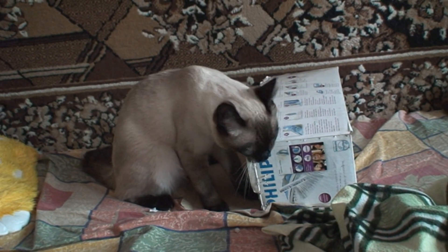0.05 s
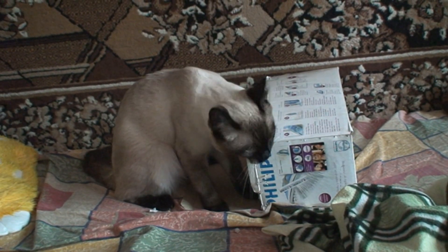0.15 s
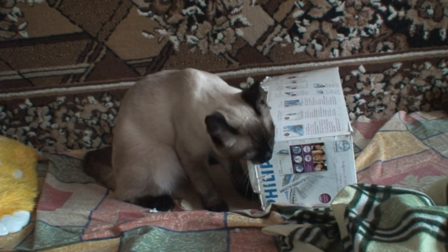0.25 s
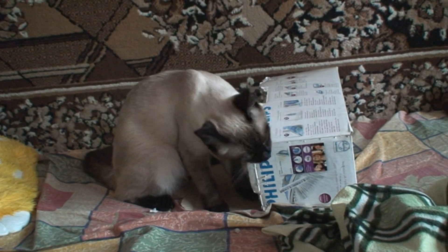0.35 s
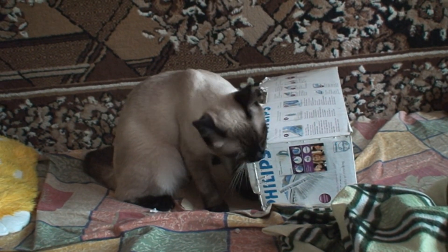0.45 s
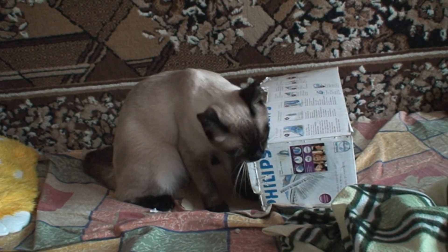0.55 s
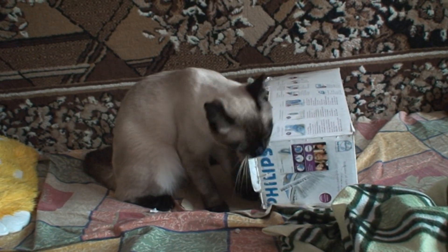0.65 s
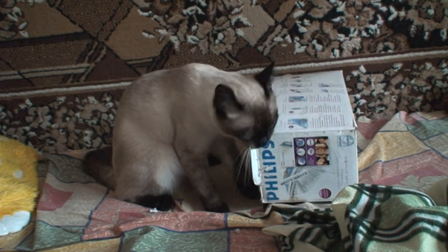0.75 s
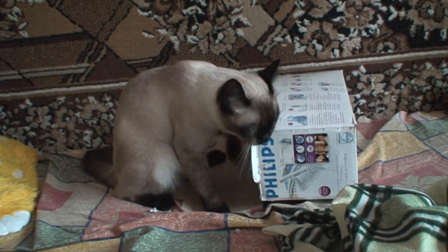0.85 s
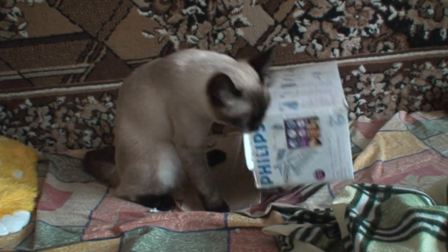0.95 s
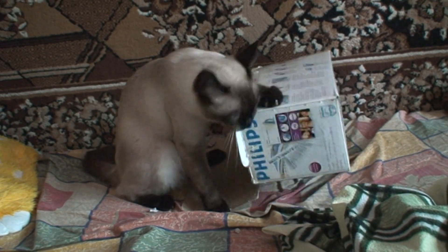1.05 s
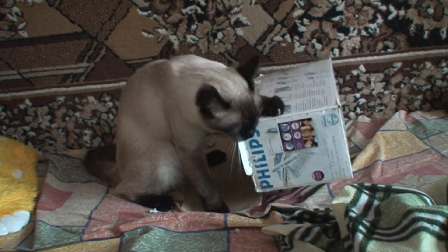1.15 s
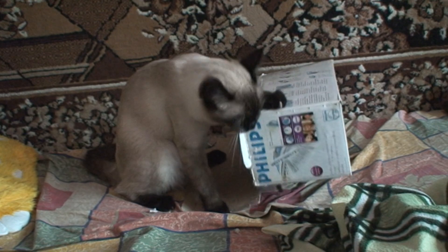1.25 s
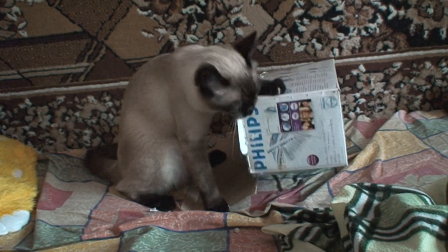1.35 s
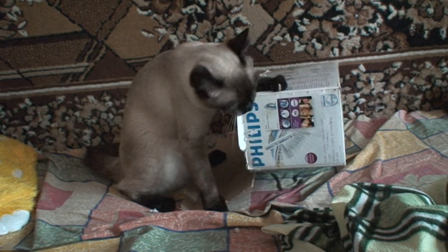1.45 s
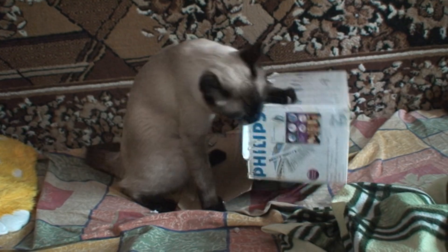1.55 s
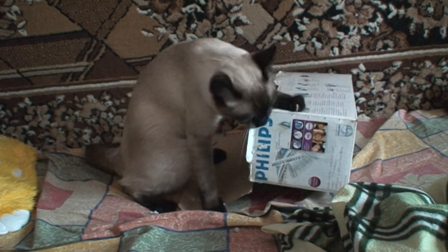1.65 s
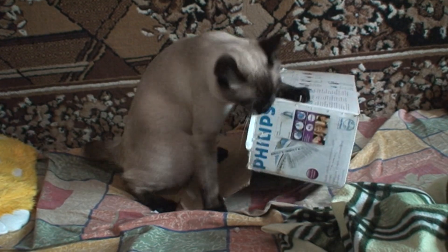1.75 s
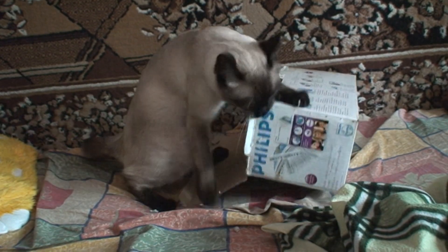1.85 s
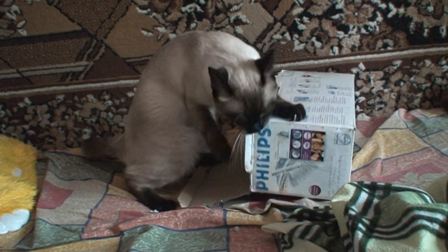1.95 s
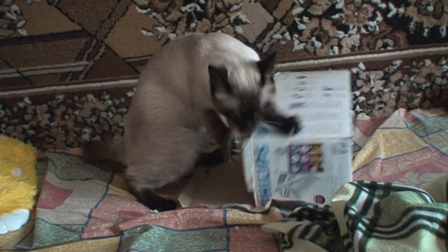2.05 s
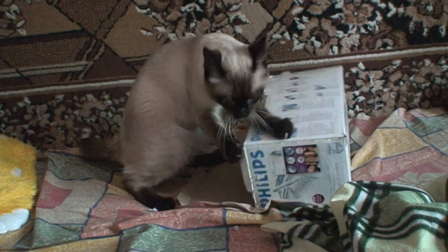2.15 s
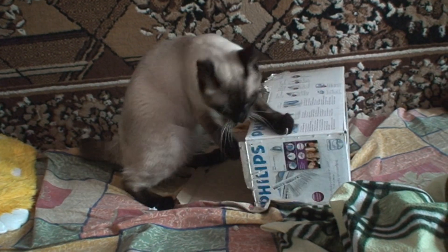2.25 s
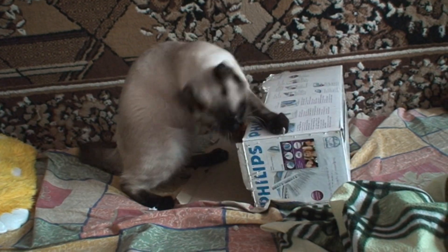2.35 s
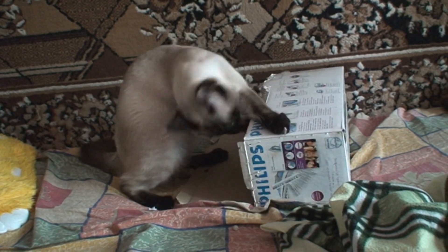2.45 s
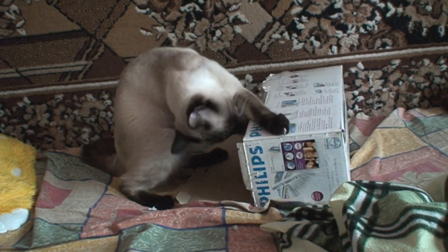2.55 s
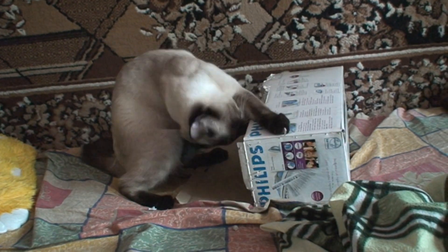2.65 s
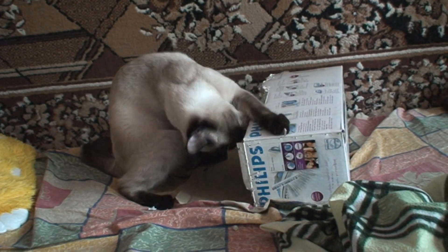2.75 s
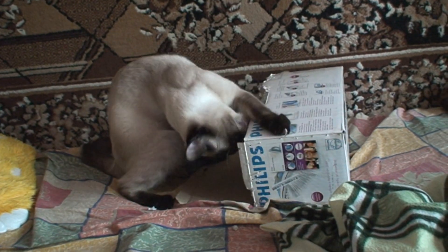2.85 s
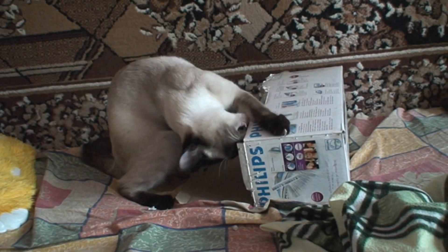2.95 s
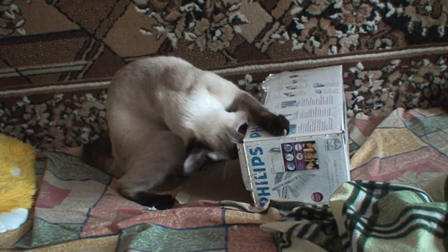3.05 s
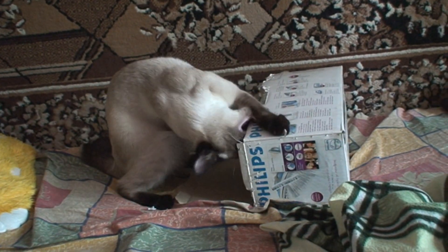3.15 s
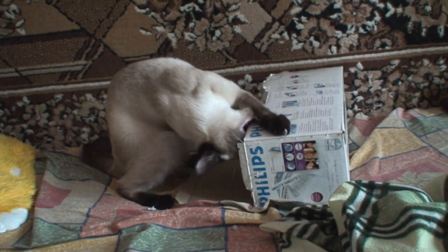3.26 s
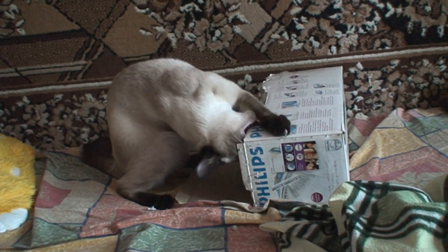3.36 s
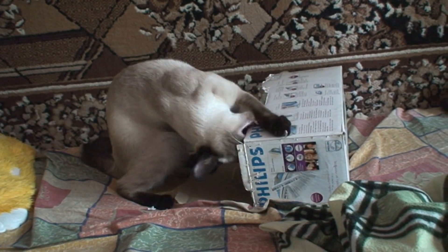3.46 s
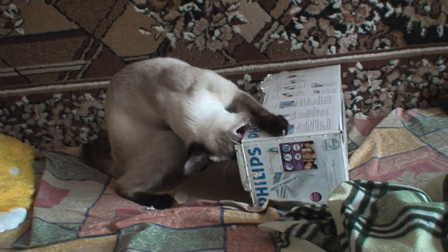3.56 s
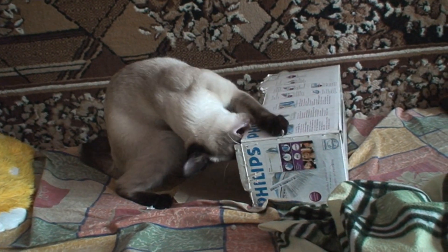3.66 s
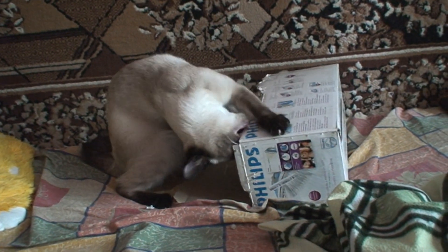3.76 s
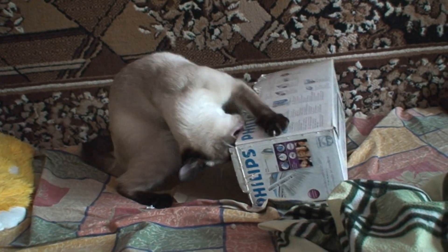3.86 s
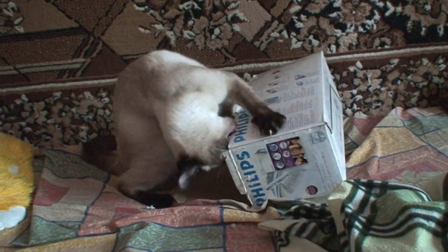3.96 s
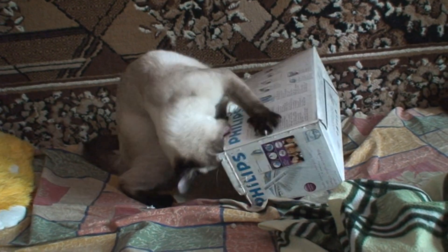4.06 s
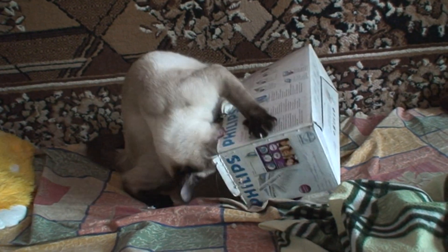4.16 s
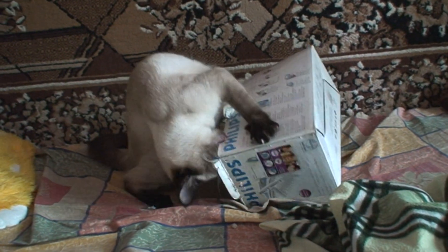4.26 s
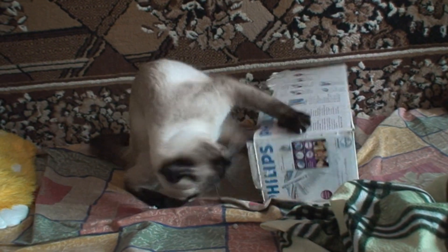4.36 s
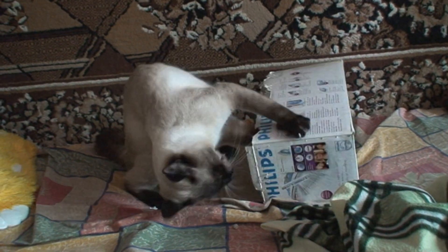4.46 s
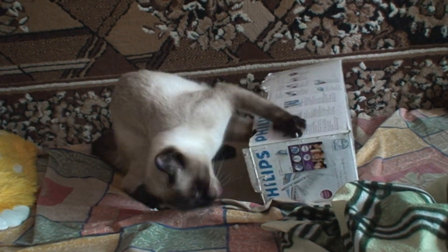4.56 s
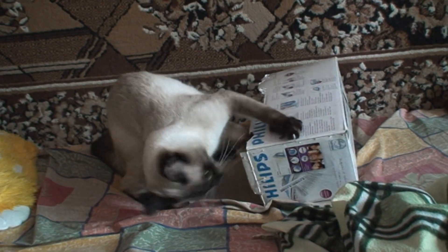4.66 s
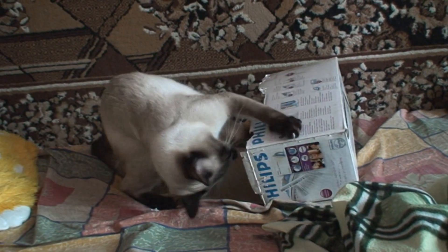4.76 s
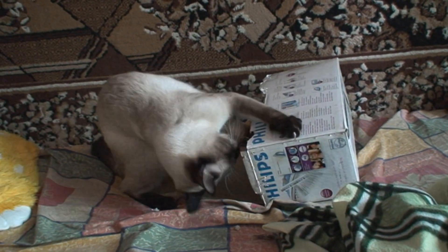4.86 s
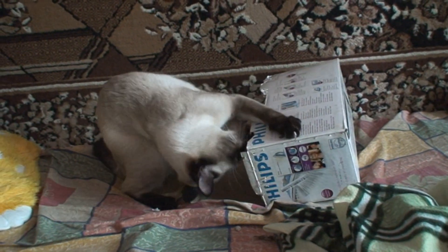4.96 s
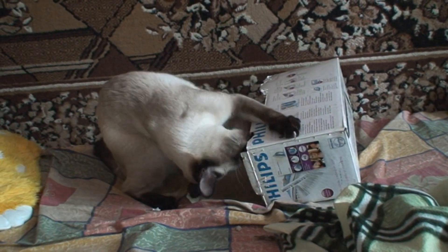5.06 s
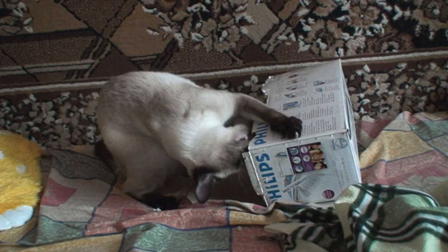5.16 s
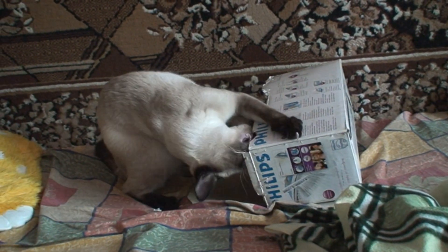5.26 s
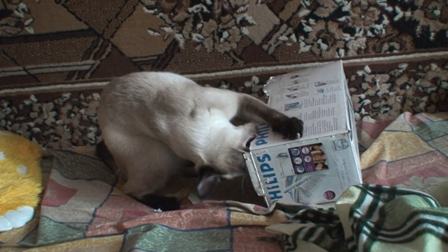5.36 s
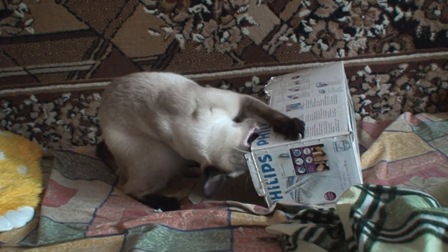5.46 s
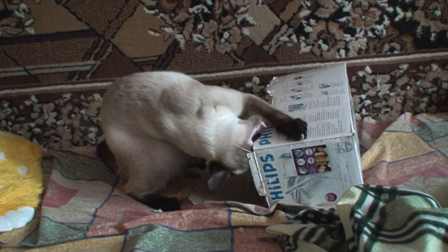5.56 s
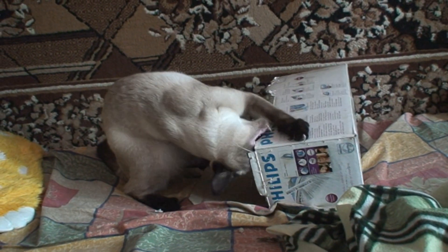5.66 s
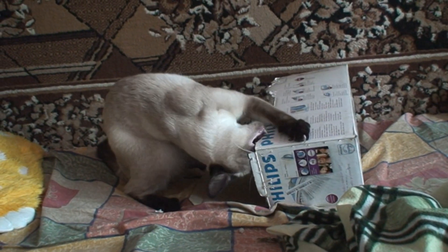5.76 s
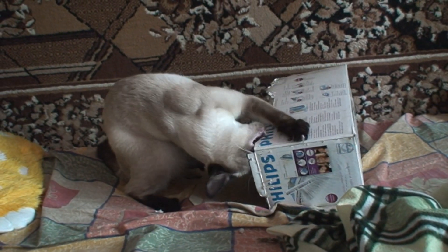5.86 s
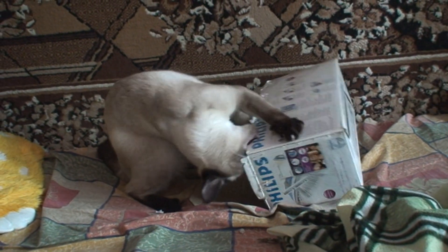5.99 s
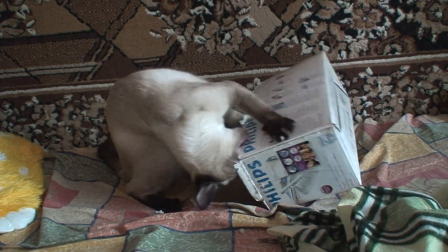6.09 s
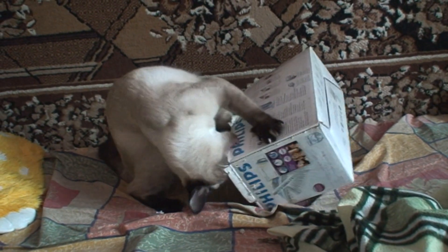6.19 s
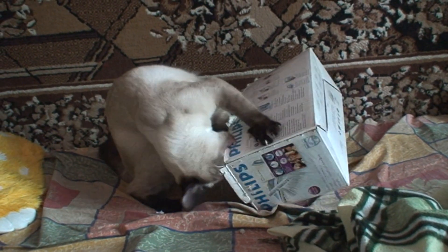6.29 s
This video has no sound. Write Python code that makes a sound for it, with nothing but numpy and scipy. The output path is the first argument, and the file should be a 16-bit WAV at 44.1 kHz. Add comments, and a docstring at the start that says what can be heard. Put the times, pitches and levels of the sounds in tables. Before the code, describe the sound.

In a small furnished room with a soft low rush, a cat worries a cardboard box. Muffled bumps come first, then a drop and sharp hollow snap near one second, a harder knock just after two, sparse scratches, and a dense flurry of cracks, tooth grinding and a loud hollow thud past four. Faint scraping and ticking follow, ending in crisp crackles. Close stereo microphone, short dry echoes.

```python
"""A cat bites and claws a small cardboard box on a carpet in a quiet room; box modes and short echoes colour it.
From the start there is shaped noise with narrow hums; padded blows (decaying sines) and snaps (a click, then
noise bursts) soon join it. Near 0.9 and 2.1 s the box drops with a thump and a puff, and strokes of random slips
scrape and tear. From 4 to 4.4 s blows crowd, teeth grind by stick-slip and the box drops again; scrapes and snaps
go on to 6.3 s. The noise sinks at 1.03, 2.1 and 4.42 s, each time creeping part of the way back."""
import sys
import numpy as np
from scipy import signal
from scipy.fft import rfft, irfft, next_fast_len
from scipy.io import wavfile

SR = 44100
rng = np.random.default_rng(int(sys.argv[2]) if len(sys.argv) > 2 else 0)


def materialize(psi):
    """Save the field psi as 16-bit PCM at rate SR to the path in sys.argv[1].

    A 1-D psi becomes a single channel; in a 2-D psi each row is a channel.
    """
    bounded = np.clip(np.atleast_2d(psi).T, -1, 1)
    quanta = np.round(bounded * 32767).astype(np.int16)
    wavfile.write(sys.argv[1], SR, quanta)


N = 278961  # samples

# spectrum of the rushing room noise, relative: frequency_hz, density_db_per_hz
RUSH_SPECTRUM = [(15, -34), (25, -20), (49, 6.5), (80, -2), (206, -1), (363, -3.5), (394, -7.5), (439, -4),
                 (734, -6.5), (818, -3), (1020, -5.5), (2610, -14), (9570, -29), (13600, -32), (16000, -44)]
# narrow hums in the room noise, level relative to the rush: centre_hz, width_hz, level_db
HUM_BANDS = [(61.1, 4, -24), (112, 8.7, -27), (790.5, 42, -13.5)]
# sudden dips of the room noise, before its trim: start_s, lowest_db
NOISE_DIPS = [(1.03, -48), (2.1, -54.5), (4.42, -53)]
# left-right coherence of diffuse sound: frequency_hz, likeness (0 to 1)
COHERENCE = [(60, 0.99), (130, 0.96), (290, 0.85), (640, 0.55), (1410, 0.54), (3100, 0.67), (6820, 0.53),
             (15000, 0.99)]
# early wall echoes, before a small random shift: delay_s, gain (ratio)
WALL_ECHOES = [(.0025, 0.14), (.0083, 0.32), (0.0127, .15), (0.0228, .15)]
# reverberation time of the room: frequency_hz, t60_s
REVERBERATION = [(100, 0.23), (300, 0.23), (1000, 0.16), (4000, 0.16), (13000, 0.17)]
# modes of panels, flaps and air cavity, relative to the direct force: centre_hz, width_hz, gain_db
BOX_MODES = [(122.6, 14, 3.5), (199.2, 23, 10), (291, 18.8, 15), (532, 97, 9.5), (872, 49, 7),
             (1228, 52, -9), (1697, 30, -8), (2640, 120, -3.5), (3210, 270, -11), (7200, 1500, -1.5),
             (11840, 960, -1)]
# edges of the thud, hollow, rasp, crack and fizz bands: edge_hz
BAND_EDGES = [120, 400, 1000, 2800, 8000, 16000]
# the box dropping back on the carpet: start_s, level_db, panel_hz, left_minus_right_db
BOX_DROPS = [(0.926, -18, 124.5, -0.5), (2.081, -17, 121, -9), (4.36, -26.5, 132, -16)]
# soft bumps of paw and box, before their trim: start_s, level_db, panel_hz
PAW_BUMPS = [(.007, -28, 294), (.064, -25, 167), (.385, -25, 141), (.507, -20.5, 528), (.534, -25.5, 239),
             (0.723, -39, 291), (.955, -22.5, 126), (1.49, -28, 638), (1.51, -21, 80), (1.633, -31, 480),
             (2.078, -15.5, 526), (2.085, -15, 530), (2.268, -23.5, 307), (2.676, -26.5, 532),
             (3.410, -24, 207), (3.884, -24.5, 520), (4.345, -19.5, 191), (4.363, -8.5, 521),
             (4.463, -28, 566), (4.576, -30, 578), (5.361, -24, 560)]
# a tooth grinding in the board, rms before the room: centre_s, half_length_s, rms_db, pitch_hz
TOOTH_GRINDS = [(3.959, 0.021, -41, 1570), (4.205, 0.013, -28.5, 1100), (4.244, .005, -31, 795),
                (4.257, 0.013, -34, 980), (6.027, 0.023, -41, 1180)]
# scraping and tearing strokes, before their trim:
# centre_s, half_length_s, level_db, brightness_db_per_octave, hollowness_db
SCRAPE_STROKES = [(0.496, 0.051, -51.5, -6, 4), (0.855, 0.06, -52.5, -1, 7), (1.46, 0.077, -56.5, -1.7, 1),
                  (1.63, 0.088, -61, -3, -4), (1.82, 0.17, -57.5, -0.5, 4),
                  (2.081, 0.0087, -30.5, -3.5, 6.5), (2.119, 0.028, -49, -4.3, 13),
                  (2.262, 0.023, -59.5, -1.5, 2), (2.507, 0.068, -50, -0.5, 14.5),
                  (2.707, .035, -56, -2.5, 17), (3.011, 0.061, -50, -0.2, 20),
                  (3.548, 0.094, -57, -4.5, 10), (3.857, 0.13, -50, -1.5, 11.5),
                  (3.972, 0.066, -46, -2.1, 4), (4.039, 0.075, -50, 0.5, 4.5),
                  (4.121, 0.076, -50.5, -1.1, 1), (4.189, 0.037, -50, 0.5, -1.5),
                  (4.255, 0.035, -43, -2, 4), (4.336, .016, -42, -2.5, 1), (4.36, .028, -29.5, -1, 3.5),
                  (4.396, 0.043, -35.5, 0.5, 7.5), (4.438, 0.039, -46, -.5, 14),
                  (4.596, 0.058, -56, -3, 14), (4.969, 0.35, -62, -4, 9), (5.447, 0.033, -53.5, -3.5, 13),
                  (5.622, 0.068, -57, -3, 2), (5.759, 0.069, -54.5, -4, 3.5), (5.924, 0.038, -52, -1.3, 2),
                  (6.031, .025, -46.5, -4, 3.5), (6.084, .07, -47.5, -2, 6), (6.145, 0.095, -48, -1, 4.5),
                  (6.223, 0.094, -53.5, 0, 0.5), (6.285, 0.043, -41.5, 0.5, 0)]
# colour shared by all strokes, one value per band: gain_db
STROKE_COLOUR = [1.1, 0.83, -0.92, -1.5, -0.51]
# teeth and claws snapping the board, before their trim:
# start_s, level_db, brightness_db_per_octave, hollowness_db, spot_pitch_hz
BOARD_SNAPS = [(0.0706, -46.5, 2, 14.5, 2500), (0.7235, -44.5, -2, 1, 1220), (0.9241, -40.5, -3, 0, 1220),
               (1.066, -20, -2.5, 19.5, 1290), (1.087, -44, -1, 7, 1290), (1.4881, -46, -4.5, 0.5, 1250),
               (1.729, -46.5, 1, 18, 1700), (1.852, -42.5, 0.6, 22.5, 2070), (2.0851, -28, -5, 19.5, 1210),
               (2.095, -40, -4.5, 6, 1190), (2.4746, -38.5, -0.5, 18, 1630), (2.6776, -41, -0.5, 18, 1730),
               (3.7, -47.5, -3, 3.5, 960), (3.7208, -39.5, -1.8, 3.5, 1190),
               (3.8841, -39.5, -3.5, 12, 1550), (3.9074, -46, -1.5, 14, 2680), (3.9425, -54, 0, 4, 1340),
               (3.9679, -41, 0.5, 0, 2000), (4.0635, -25, -3.5, 13.5, 1170), (4.1813, -46, 0.9, 2, 1490),
               (4.3278, -48, -4, 5, 1380), (4.344, -37, -2.7, -5.5, 1250), (4.3768, -30, 1.5, 10, 1020),
               (4.3874, -30.5, 1.5, 13, 900), (4.5765, -49, -2.5, 12, 1230), (4.6318, -53.5, 1.5, 12, 2430),
               (4.7573, -58, 2.5, 2.5, 1030), (4.9605, -77.5, 5, -4, 1270), (5.3612, -42.5, -1.5, 13, 880),
               (5.4126, -52, -4.5, 3, 970), (5.4216, -52.5, -1.8, 3, 950), (5.4904, -58, 3.5, 11.5, 1480),
               (5.7304, -46.5, -2, 6.5, 1380), (5.9026, -52, -1, 3, 1040), (5.9971, -53.5, -2, -0.5, 1120),
               (6.0599, -40.5, 4.5, 30, 1010), (6.086, -41, 1.5, 15.5, 1380), (6.2863, -34, 1.6, 7, 1040),
               (6.2961, -52, -3.5, 8, 1060)]
# stereo balance of the microphones: frequency_hz, left_minus_right_db
STEREO_LEAN = [(60, -2), (110, -0.5), (200, -2), (380, -2), (700, -2.5), (1290, -2), (2380, -1), (4400, 0),
               (8120, -1.5), (15000, -1)]

# the room noise before its trim: undisturbed level, and how it sinks, waits and creeps back
NOISE_DB, SINK_S, HOLD_S, RECOVER_DB_PER_S = -43, 0.012, 0.51, 3
# hollowness is centred on the first; the second is where its full loss in dB is reached
MIDDLE_HZ, HALF_RANGE_OCTAVES = 1647, 2.47
TOP_HZ = 15800  # band limit


def amp(db):
    """Level definition: decibels to an amplitude ratio."""
    return 10 ** (np.asarray(db) / 20)


def unit(x):
    """Normalisation by mean power: x scaled to an rms of one."""
    return x / np.sqrt(np.mean(x ** 2) + 1e-20)


def along(points, hz):
    """Logarithmic frequency scale: interpolate (Hz, value) points at hz."""
    f, v = np.transpose(points)
    return np.interp(np.log(hz + 1), np.log(f + 1), v)


def fade(t, t60):
    """Exponential decay: the amplitude falls by 60 dB in t60 seconds."""
    return np.exp(-np.log(1000) * t / np.maximum(t60, 1e-4))


def add(track, s, x):
    """Superposition: mix x into the track at time s."""
    start = max(round(s * SR), 0)
    part = track[..., start:start + x.shape[-1]]
    part += x[..., :part.shape[-1]]


def filtered(x, response):
    """Linear filtering: the spectrum of x times a response of frequency."""
    n = x.shape[-1]
    m = next_fast_len(n + SR // 8)
    f = np.fft.rfftfreq(m, 1 / SR)
    return irfft(rfft(x, m) * response(f), m)[..., :n]


def resonances(modes, f):
    """Modal superposition: the causal response of damped (Hz, width Hz, dB) modes."""
    return sum(amp(db) * 1j * f * w / (c * c - f * f + 1j * f * w) for c, w, db in modes)


def panned(pair, lean_db):
    """Level difference between ears: tilt a stereo pair to the left by lean_db."""
    return pair * amp([[lean_db / 2], [-lean_db / 2]])


def diffuse(pair):
    """Spatial coherence: two close microphones hear diffuse sound with a likeness that depends on frequency."""
    def turn(f):
        return np.arccos(np.clip(along(COHERENCE, f), 0, 1)) / 2

    mid, side = filtered(pair, lambda f: np.array([np.cos(turn(f)), np.sin(turn(f))]))
    return np.array([mid + side, mid - side])


def in_room(x, wet_db, build=0.0014):
    """Room impulse response: direct sound, early echoes and a diffuse tail, drawn anew for each event."""
    hz, t, z = signal.stft(rng.standard_normal((2, SR // 4)), SR, nperseg=256)
    envelope = fade(t, along(REVERBERATION, hz)[:, None]) * (1 - np.exp(-t / build))
    tail = diffuse(signal.istft(z * envelope, SR, nperseg=256)[1])
    response = amp(wet_db) * tail / np.linalg.norm(tail[0])
    response[:, 0] += 1  # direct sound
    for delay, gain in WALL_ECHOES:
        response[:, round(delay * rng.uniform(.95, 1.05) * SR)] += gain
    return signal.fftconvolve(x[None], response, axes=1)


def board(force, soft_hz=3000, crisp=0.069):
    """Forced vibration: the force is heard directly and through the box modes; soft board damps the treble."""
    def response(f):
        damping = crisp + 1 / (1 + 1j * f / soft_hz)
        return (1 + resonances(BOX_MODES, f)) * damping

    return filtered(force, response)


def band_centres():
    """Logarithmic band division: each centre is the geometric mean of its edges in Hz."""
    return np.sqrt(np.multiply(BAND_EDGES[:-1], BAND_EDGES[1:]))


def contact(db, brightness, hollowness):
    """Contact spectrum: a sharp tip tilts it to the treble, a free panel lowers both ends against the middle."""
    octaves = np.log2(band_centres() / MIDDLE_HZ)
    return db + brightness * octaves - hollowness * (octaves / HALF_RANGE_OCTAVES) ** 2


def voiced(x, levels_db, span, lowest_hz=130):
    """Minimum-phase filtering: steer the bands of x smoothly towards rms levels taken over span seconds."""
    m = 2 * next_fast_len(len(x))
    f = np.fft.rfftfreq(m, 1 / SR)
    # a small box radiates little bass
    spectrum = rfft(x, m) * (1j * f / (lowest_hz + 1j * f)) ** 2
    energy = np.histogram(f, BAND_EDGES, weights=np.abs(spectrum) ** 2)[0]
    power = energy * 2 / (m * span * SR)
    band_gain = np.log(amp(levels_db) / np.sqrt(power))
    log_gain = along(np.transpose([band_centres(), band_gain]), f)
    # folding the cepstrum onto positive times makes the filter causal
    cepstrum = irfft(log_gain)[:m // 2]
    cepstrum[1:] *= 2
    return irfft(spectrum * np.exp(rfft(cepstrum, m)))[:len(x)]


def noise_level():
    """Piecewise-linear level in dB: after each dip it waits, then creeps back at a steady rate."""
    t = np.arange(N) / SR
    level = np.full(N, float(NOISE_DB))
    for s, low_db in NOISE_DIPS:
        recovered = low_db + RECOVER_DB_PER_S * np.maximum(t - s - HOLD_S, 0)
        creeping = np.minimum(recovered, NOISE_DB)
        sunk = np.clip((t - s) / SINK_S, 0, 1)
        level = level + sunk * (creeping - level)
    return level


def room_noise(level_db=-0.5):
    """Diffuse field: a rush of shaped noise and narrow-band hums come from all around."""
    rush, hum = rng.standard_normal((2, 2, N))
    noise = unit(filtered(rush, lambda f: amp(along(RUSH_SPECTRUM, f))))
    for hz, width_hz, db in HUM_BANDS:
        band = filtered(hum, lambda f: resonances([(hz, width_hz, 0)], f) ** 2)
        noise = noise + amp(db) * unit(band)
    return diffuse(noise) * amp(level_db + noise_level())


def drops(t60=0.08, attack=0.0036, puff_db=-7, puff_time=0.0034, lowest_hz=58):
    """Impact and air displacement: a flat landing thumps the big panel and squeezes out a puff of air."""
    out, t = np.zeros((2, N)), np.arange(SR // 5) / SR
    for s, db, hz, lean_db in BOX_DROPS:
        panel = np.sin(2 * np.pi * hz * t) * fade(t, t60)
        # a pressure pulse that swings over into suction
        puff = amp(puff_db) * t / puff_time * (2 - t / puff_time) * np.exp(1 - t / puff_time)
        landing = amp(db) * (panel + puff) * (1 - np.exp(-t / attack))
        add(out, s, panned(in_room(landing, wet_db=-8), lean_db))
    # so small a box radiates no deep bass
    return signal.sosfilt(signal.butter(2, lowest_hz, "high", fs=SR, output="sos"), out)


def bumps(level_db=-4, attack=0.003, soft_hz=700, shake_t60=0.068, panel_t60=0.051,
          low_rings_longer=0.091, clatter_db=-2, lean_db=-0.5):
    """Damped free vibration: a padded blow swings one panel and shakes the box; low panels ring longer."""
    out, t = np.zeros((2, N)), np.arange(SR // 5) / SR
    padding = signal.butter(2, [80, soft_hz], "band", fs=SR, output="sos")
    for s, db, hz in PAW_BUMPS:
        ring_t60 = panel_t60 * (500 / hz) ** low_rings_longer  # panel_t60 is that of a 500 Hz panel
        panel = np.sin(2 * np.pi * hz * t) * fade(t, ring_t60)
        shake = board(rng.standard_normal(len(t)) * fade(t, shake_t60))
        shake = signal.sosfilt(padding, shake)
        clatter = amp(clatter_db) * shake / np.abs(shake).max()
        blow = (panel + clatter) * (1 - np.exp(-t / attack))
        add(out, s, panned(in_room(amp(db + level_db) * blow, wet_db=-10.5), lean_db))
    return out


def grinds(median_slips_per_s=420, uneven=.45, width_hz=650):
    """Stick-slip friction: a tooth slips at an uneven rate and each slip rings the crushed flutes."""
    out = np.zeros((2, N))
    for s, half_length, db, hz in TOOTH_GRINDS:
        intervals = np.exp(uneven * rng.standard_normal(40)) / median_slips_per_s
        slips = np.cumsum(intervals)  # slip times in s
        pressure = np.sin(np.pi * np.minimum(slips / (2 * half_length), 1))
        force = np.bincount((slips * SR).astype(int), pressure)

        def flutes(f):
            return resonances([(hz, width_hz, 0)], f) * resonances([(hz, 4 * width_hz, 0)], f)

        ring = filtered(board(force), flutes)
        gain = amp(db) * np.sqrt(half_length * SR) / np.linalg.norm(ring)  # rms over half_length
        add(out, s - half_length, in_room(gain * ring, wet_db=-7.0))
    return out


def scrapes(level_db=-2, peak_slips_per_s=2000, spiky=0.69, rub=0.13, flutes_per_s=190,
            flute_db=4.0, slip_hz=4500):
    """Random impulse friction: a dragged tip catches on fibres, and slips crowd where it presses hardest."""
    out = np.zeros((2, N))
    for s, half_length, db, brightness, hollowness in SCRAPE_STROKES:
        t = np.arange(int((2 * half_length + .06) * SR)) / SR
        pressure = np.sin(np.pi * np.minimum(t / (2 * half_length), 1)) ** 2
        caught = rng.random(len(t)) < peak_slips_per_s * np.sqrt(pressure) / SR
        grain, size, ridges = rng.standard_normal((3, len(t)))
        # the corrugations make the slips come in clumps
        clumps = amp(flute_db * np.interp(t * flutes_per_s, np.arange(len(t)), ridges))
        impulses = caught * clumps * np.sign(grain) * np.exp(spiky * size)
        # the slips are coarse and dull; the fine rubbing between them carries the treble
        slips = filtered(impulses, lambda f: 1 / (1 + 1j * f / slip_hz))
        force = pressure * (slips + rub * grain)
        levels = contact(db + level_db, brightness, hollowness) + STROKE_COLOUR
        add(out, s - half_length, in_room(voiced(board(force), levels, half_length), wet_db=-3.5))
    return out


def snaps(level_db=-0.15, crumble=0.19, crumble_t60=0.038, hard_db=-28, spiky=0.87, spot_db=4,
          hollow_ring=0.33, spot_width_hz=100, wet_db=-3.0):
    """Brittle fracture: the liner clicks, fibres crumble and the bitten spot rings, more so if hollow."""
    out, t = np.zeros((2, N)), np.arange(SR // 8) / SR
    for s, db, brightness, hollowness, hz in BOARD_SNAPS:
        grain, size = rng.standard_normal((2, len(t)))
        # a hard blow breaks the same fibres in a shorter time than the slow crumble_t60
        speed = 1 + amp(db - hard_db) ** 2
        fibres = grain * np.exp(spiky * size) * fade(t, crumble_t60 / speed)
        force = crumble * np.sqrt(speed) * fibres
        force[0] = 2  # the click of the liner
        spot = [(hz, spot_width_hz, spot_db + hollow_ring * hollowness)]
        ring = filtered(board(force), lambda f: 1.5 + resonances(spot, f))
        levels = contact(db + level_db, brightness, hollowness)
        add(out, s, in_room(voiced(ring, levels, span=0.0097), wet_db))
    return out


def scene():
    """Superposition of all sources, from the background to the snaps."""
    return room_noise() + drops() + bumps() + grinds() + scrapes() + snaps()


def record(dry, ceiling=0.3):
    """Saturation and band limiting: the right side is a little louder, high peaks are rounded, the top is cut."""
    picked = filtered(dry, lambda f: amp(np.outer([.5, -.5], along(STEREO_LEAN, f))))
    rounded = picked / (1 + (picked / ceiling) ** 4) ** (1 / 4)
    return filtered(rounded, lambda f: f < TOP_HZ)


dry = scene()
out = record(dry)
materialize(out)
```